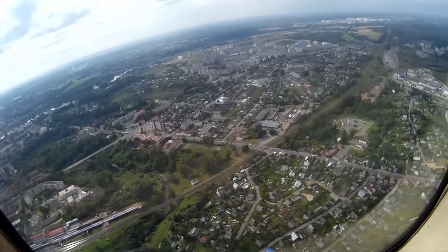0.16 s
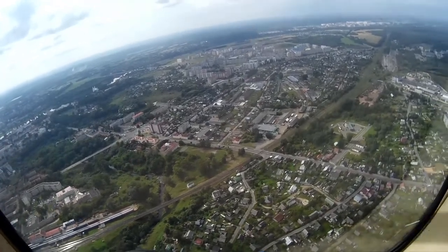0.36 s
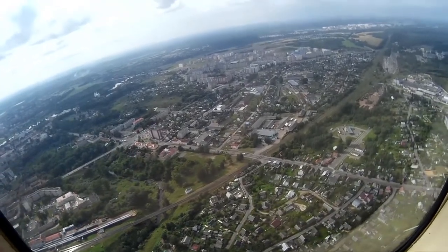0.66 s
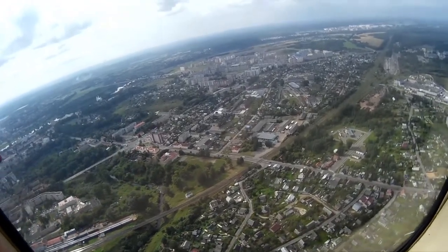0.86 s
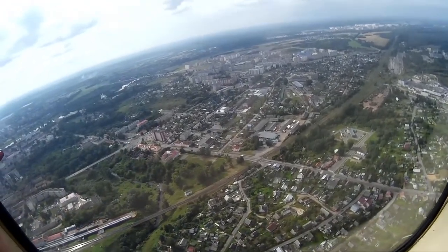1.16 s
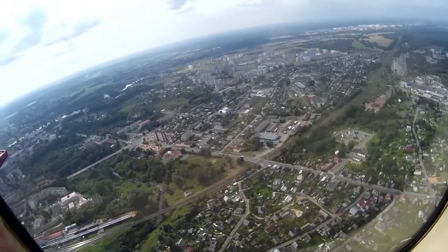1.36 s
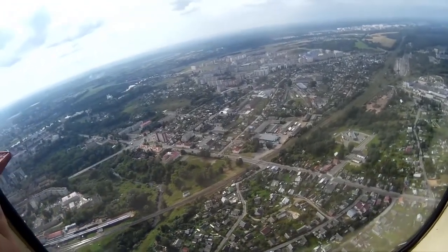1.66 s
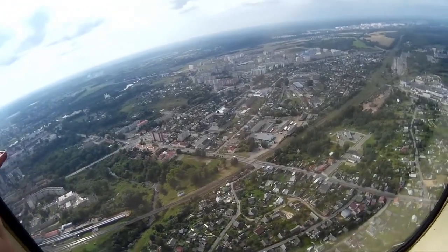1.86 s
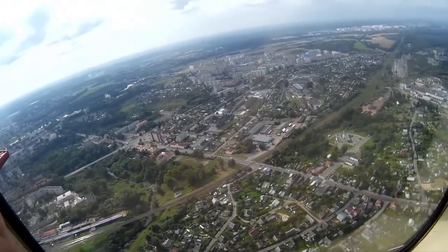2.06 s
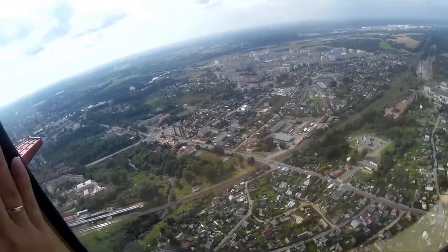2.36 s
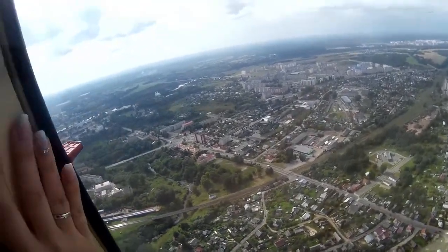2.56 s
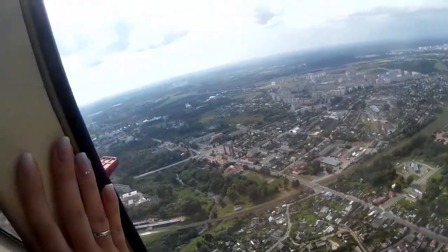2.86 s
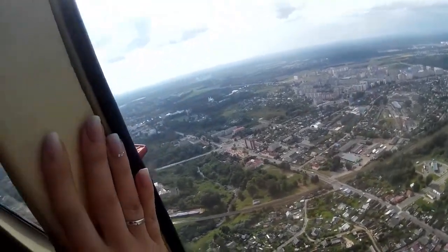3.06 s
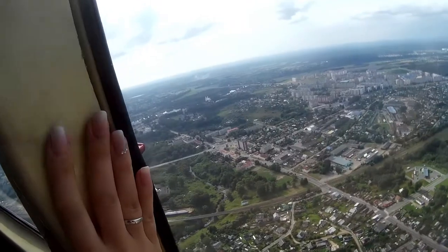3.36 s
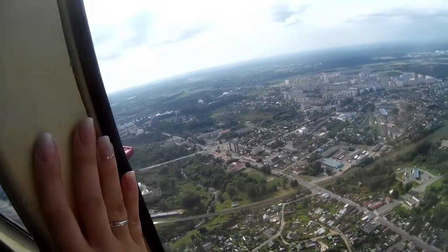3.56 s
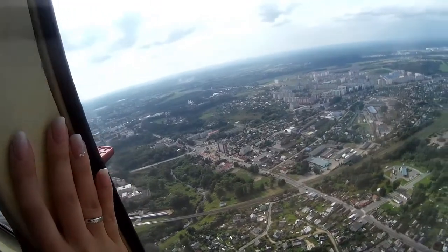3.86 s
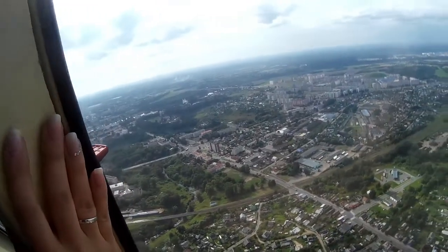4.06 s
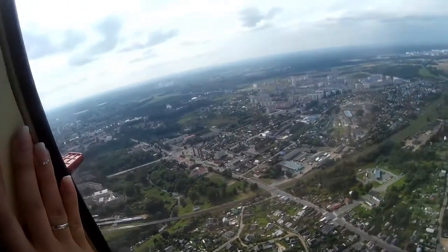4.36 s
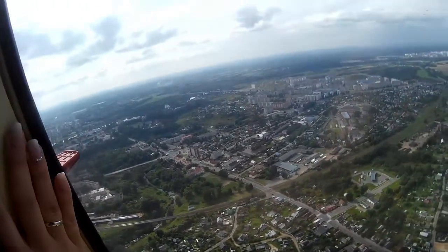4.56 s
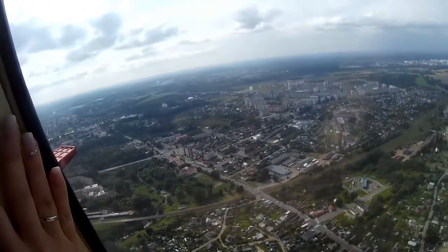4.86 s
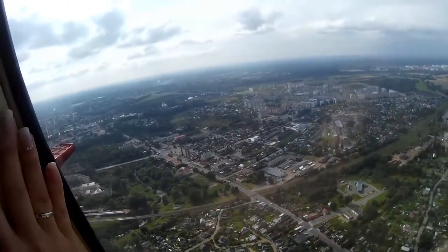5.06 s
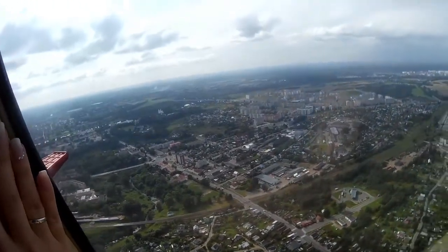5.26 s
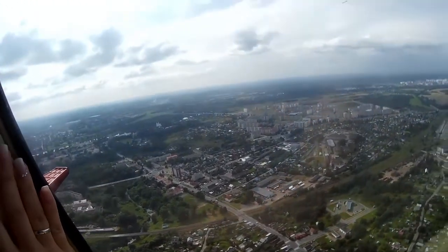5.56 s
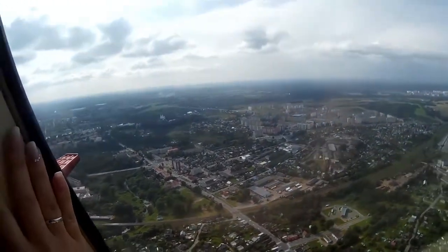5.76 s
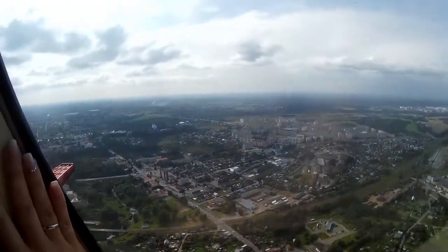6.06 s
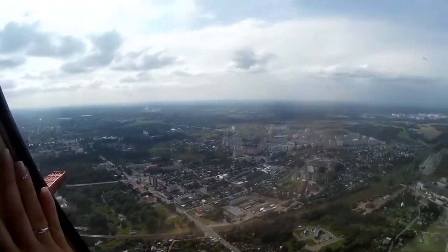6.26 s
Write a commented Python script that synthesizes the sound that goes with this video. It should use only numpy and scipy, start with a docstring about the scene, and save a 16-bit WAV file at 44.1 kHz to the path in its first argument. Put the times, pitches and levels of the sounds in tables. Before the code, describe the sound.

Inside a flying helicopter cabin, a loud steady engine drone and low hum sit under a piercing, fluttering gear whine, with wind roar throughout.

```python
"""Helicopter cabin in level flight

Heard by a small camera held by hand at the window. Gear teeth whine, shafts and a pump hum, and blades
pump the air: sines that follow one slowly wandering rotor speed. One free tone keeps its own speed.
Wind and engine roar and turbine hiss are shaped noise. The overloaded microphone clips the crests."""
import sys
import numpy as np
from scipy import signal
from scipy.fft import rfft, irfft
from scipy.io import wavfile
from scipy.ndimage import uniform_filter1d

SR = 44100
rng = np.random.default_rng(int(sys.argv[2]) if len(sys.argv) > 2 else 0)


def ratio(d):
    """dB to gain"""
    e = np.asarray(d, float) / 20
    return 10 ** e


def materialize(psi):
    """Save the field psi as 16-bit PCM at rate SR to the path in sys.argv[1].

    A 1-D psi becomes a single channel; in a 2-D psi each row is a channel.
    """
    bounded = np.clip(np.atleast_2d(psi).T, -1, 1)
    quanta = np.round(bounded * 32767).astype(np.int16)
    wavfile.write(sys.argv[1], SR, quanta)


N = 282240  # samples, 6.4 s

# Noise colour of wind and engines through the hull. Each row: frequency in Hz, relative density in dB per Hz.
ROAR_COLOUR = [(3, -25), (15, -4), (32, -2.5), (54, -4), (95, -1.5), (120, -4), (165, 4), (215, -3.5),
               (250, -1.5), (350, -7.5), (720, -11), (1500, -20), (2600, -23), (3600, -34.5), (4500, -34),
               (15000, -59.5)]
# Gusts on the hull. Each row: time in seconds, deep buffet gain in dB, boom gain in dB.
GUSTS = [(0, -2, 0.5), (1.2, 0, -0.5), (2.4, -4.5, -4.5), (3.6, -2, -2.5), (4.8, 0, -1.5), (5.6, -2, -2),
         (6.4, 6, 1)]
ROAR_DB = -16  # rms
HISS_HZ, HISS_WIDTH_HZ, HISS_DB = 11560, 850, -55.5  # level in dB rms before its slow waver

# Pitch of a tone that keeps its own speed. Each row: time in seconds, frequency in Hz.
FREE_TONE_PITCH = [(0, 683), (1, 682), (2.5, 679.6), (4, 686), (5.4, 688), (6.4, 682)]
FREE_TONE_DB = -32.5  # rms, before its waver

# Rotor speed, shown by the pitch of the input gear mesh. Each row: time in seconds, tooth rate in Hz.
MESH_PITCH = [(0, 2266.5), (.3, 2271.4), (.91, 2277.6), (1.4, 2278.2), (2, 2275.7), (2.44, 2276),
              (2.85, 2271.7), (3.28, 2277), (3.7, 2267.5), (4.0, 2269.5), (4.57, 2269.2), (5.3, 2286.5),
              (5.92, 2278.8), (6.4, 2288)]
# Every other rate that follows the rotor is the one at this usual tooth rate.
USUAL_MESH_HZ, SHAFT_TEETH = 2275.5, 23
PUMP_HZ, MAIN_GEAR_HZ, BLADE_HZ = 152.83, 644., 12.39
BLADE_DB, BLADE_FIRST_S, BLADE_THROB = -20, 0.039, 0.16  # dB rms, first crest in s, share of gear level

# Tones that swell as the camera moves through the cabin's standing waves. Each row: time in seconds,
# pump third harmonic in dB, then main gear harmonics 1, 2, 3, 6 and 7 in dB.
SWELLING_TONES = [(0, -19.5, -19.5, -25.5, -33, -51, -42), (1.1, -20, -19.5, -33, -33, -47, -47),
                  (2.1, -20.5, -20, -32, -35, -45, -45), (2.3, -21.5, -20.5, -28.5, -29, -56, -46),
                  (3.2, -22, -21.5, -28.5, -37, -52, -53), (3.7, -23, -20, -29.5, -48, -52, -52),
                  (4.4, -21.5, -19.5, -23, -35, -49, -49), (5.3, -19.5, -19, -22, -29, -53, -47),
                  (6.1, -18.5, -18.5, -31, -30, -50, -53), (6.4, -20, -18.5, -26.5, -32, -48, -50)]
GEAR_HARMONICS = 1, 2, 3, 6, 7
# Steadier pump hum. Each row: harmonic number, level in dB rms before its waver.
PUMP_HARMONICS = [(1, -14.8), (2, -27.5), (4, -33), (5, -37), (6, -40), (7, -35), (8, -44), (9, -42),
                  (10, -43), (11, -44)]
# Drive shaft hum. Each row: harmonic number, level in dB rms before its waver.
SHAFT_HARMONICS = [(1, -14.6), (2, -33), (10, -46)]
# Other tones that follow rotor speed: faint hums, and sum and difference tones of whine and main gear.
# Each row: frequency in Hz, level in dB rms before its waver.
FAINT_TONES = [(48.4, -45), (128.9, -39), (243, -36), (402.1, -33), (491.2, -42), (578.7, -37), (827, -35),
               (987.5, -40), (1073.3, -36), (1116.4, -37), (1255.3, -43), (1483.8, -44), (1631.5, -40),
               (1664.1, -46), (1879.8, -44), (1970, -45), (2023.4, -51), (2122.7, -41), (1986, -42),
               (1507, -44), (1545, -44.5), (2675, -48), (2880, -48), (5010, -55), (5593, -60),
               (2919.4, -44.5), (3092.4, -50), (3348.7, -53)]
FAINT_TONE_WAVER_DB = 1.5

# Three shakes of the airframe, the middle one near blade rate. Each row: rate in Hz, first crest in seconds.
AIRFRAME_SHAKES = [(10.918, .0592), (12.433, .0062), (13.223, .03)]
# Throb of the whine by each shake; below 0 crests and dips swap. Each row: time in seconds,
# share of level from the slow, middle and quick shake at the usual whine level.
THROB_DEPTHS = [(0.0, 0.11, 0.26, -0.08), (0.5, 0.06, 0.31, 0.07), (1.0, 0.23, 0.0, -0.01),
                (1.5, 0.23, 0.26, 0.06), (2.1, 0.17, -0.05, 0.03), (2.7, 0.21, -0.09, 0.38),
                (3.2, 0.25, 0.56, 0.06), (3.7, 0.34, -0.01, 0.24), (4.2, 0.09, 0.55, -0.32),
                (4.7, 0.14, -0.41, -0.64), (5.2, 0.3, 0.09, -0.32), (5.8, 0.25, -0.04, -0.51),
                (6.4, 0.18, -0.28, -0.45)]
# Gear whine as the camera moves through the standing waves. Each row: time in seconds,
# level in dB rms before the throb.
WHINE_LEVEL = [(0, -16), (.35, -15.6), (.9, -18.5), (1.3, -13.8), (1.55, -17.5), (2.2, -17), (2.5, -12.5),
               (2.72, -9.5), (3.07, -13), (3.125, -24.5), (3.3, -21.5), (3.75, -15), (4.08, -18),
               (4.8, -16.5), (5.2, -14.7), (5.6, -17), (5.8, -15), (6.4, -19.5)]
QUIET_DEEPENS, USUAL_WHINE_DB = .63, -16  # dB of throb per dB of quiet, level where it adds nothing
# Overtones of the whine. Each row: time in seconds, then second, third, fourth and fifth harmonic
# in dB before flutter and throb.
WHINE_OVERTONES = [(0, -38.5, -50, -59, -57), (1, -39, -54, -60, -57), (1.5, -42, -52, -57, -56),
                   (2.1, -41, -57, -60, -59), (3.05, -39, -50, -60, -58), (3.5, -40, -50, -59, -57),
                   (4.03, -42, -49, -64, -59), (4.5, -36.5, -54, -59, -55), (5.5, -43, -55, -63, -62),
                   (5.8, -37, -52, -60, -59), (6.4, -45, -56, -64, -64)]
OVERTONE_THROB, OVERTONE_FLUTTER_DB = 0.72, 2  # share of the whine's throb, spread in dB
WOBBLE_TURNS, OVERTONE_WOBBLE_TURNS = -0.16, -0.34  # phase swing per unit of shake
# Sidebands and a faint sixth harmonic of the whine. Each row: multiple of the mesh rate,
# shaft rates added, level in dB rms before its waver.
WHINE_SIDEBANDS = [(1, -2, -41), (1, -1, -36), (1, 1, -34), (1, 2, -35), (1, 3, -43), (6, 0, -70),
                   (1, -.435, -44), (1, .435, -44)]

CLIP = .705  # of full scale
TREBLE_HZ, ADDED_TREBLE_DB = 13800, 0.5  # gain of the treble copy added to the signal


def level(x, db):
    """Scale to an rms level."""
    return x * ratio(db) / np.sqrt(np.mean(x ** 2))


def curves(table):
    """Columns of a table, joined by straight lines in time."""
    s, *columns = np.transpose(table)
    return [np.interp(np.arange(N) / SR, s, column) for column in columns]


def walk(rate):
    """Random levels held 1 / rate s and slewed twice; spread near 1."""
    hold = int(SR / rate)
    steps = np.repeat(rng.standard_normal(N // hold + 1), hold)
    return 1.43 * uniform_filter1d(uniform_filter1d(steps, hold), hold)[:N]


def tone(turns, db):
    """Sine that follows a count of turns, at an rms level, from a random phase."""
    return np.sqrt(2) * ratio(db) * np.sin(2 * np.pi * (turns + rng.random()))


def roar():
    """Wind and engine noise in octave bands that swell together and flicker alone; gusts move the bass."""
    hz = np.maximum(np.fft.rfftfreq(N, 1 / SR), 1)
    colour_hz, colour_db = np.transpose(ROAR_COLOUR)
    colour = ratio(np.interp(np.log(hz), np.log(colour_hz), colour_db))
    spectrum = rfft(rng.standard_normal(N)) * colour
    swell_db = 0.51 * walk(0.46)
    buffet_db, boom_db = curves(GUSTS)
    octave = np.log2(np.clip(hz, 16, 16384) / 16)
    out = 0
    for k in range(11):
        # neighbouring bands crossfade, centred on 16 Hz, 32 Hz and so on
        share = np.clip(1 - np.abs(octave - k), 0, 1)
        # buffet in the bands at 16 to 64 Hz, boom in the one at 256 Hz
        gust_db = buffet_db * (k < 3) + boom_db * (k == 4)
        flicker_db = 0.67 * walk(5.5)
        out = out + ratio(gust_db + swell_db + flicker_db) * irfft(spectrum * share, N)
    return level(out, ROAR_DB)


def intake_hiss():
    """Turbine hiss: noise through a broad bell-shaped band high in the treble, wavering in level."""
    hz = np.fft.rfftfreq(N, 1 / SR)
    band = np.exp(-.5 * ((hz - HISS_HZ) / HISS_WIDTH_HZ) ** 2)
    hiss = irfft(rfft(rng.standard_normal(N)) * band, N)
    return level(hiss, HISS_DB) * ratio(1.3 * walk(2.86))


def free_tone():
    """A sine that drifts in pitch apart from the rotor."""
    turns = np.cumsum(curves(FREE_TONE_PITCH)[0]) / SR
    return tone(turns, FREE_TONE_DB + 1.8 * walk(3.25))


def faint_tones(clock):
    """Faint hums, and sum and difference tones of whine and main gear: sines that follow rotor speed."""
    return sum(tone(hz * clock, db + FAINT_TONE_WAVER_DB * walk(2.52)) for hz, db in FAINT_TONES)


def blade_cycle(clock):
    """One cosine cycle for each passing blade."""
    return np.cos(2 * np.pi * BLADE_HZ * (clock - BLADE_FIRST_S))


def blade_pumping(clock):
    """The blades pump the cabin air below the range of hearing."""
    return level(blade_cycle(clock), BLADE_DB)


def gearbox(clock):
    """Drive shaft, pump and main gear: harmonics geared to one rotor."""
    pump_db, *gear_db = curves(SWELLING_TONES)
    shaft_turns = USUAL_MESH_HZ / SHAFT_TEETH * clock
    shaft = sum(tone(k * shaft_turns, db + 0.55 * walk(3.17)) for k, db in SHAFT_HARMONICS)
    pump = tone(3 * PUMP_HZ * clock, pump_db)
    pump = pump + sum(tone(k * PUMP_HZ * clock, db + 1.03 * walk(8)) for k, db in PUMP_HARMONICS)
    gear = sum(tone(k * MAIN_GEAR_HZ * clock, db) for k, db in zip(GEAR_HARMONICS, gear_db))
    # each passing blade loads the main gear teeth
    gear = (1 + BLADE_THROB * blade_cycle(clock)) * gear
    return shaft + pump + gear


def airframe_shake(clock, whine_db):
    """Three shakes as turning complex numbers: the real part is the throb of the whine."""
    shake = 0
    for depth, (hz, first_s) in zip(curves(THROB_DEPTHS), AIRFRAME_SHAKES):
        shake = shake + depth * np.exp(2j * np.pi * hz * (clock - first_s))
    # near a quiet spot of the standing wave the same shake throbs deeper
    return shake * ratio(QUIET_DEEPENS * (USUAL_WHINE_DB - whine_db))


def whine_overtones(mesh, shake):
    """The shaking throbs each overtone too, but its shorter waves crest at other, drifting moments."""
    out = 0
    for harmonic, db in enumerate(curves(WHINE_OVERTONES), 2):
        lag_turns = 0.22 * walk(1.5) + rng.random()
        throb = 1 + OVERTONE_THROB * (shake * np.exp(2j * np.pi * lag_turns)).real
        turns = harmonic * mesh + OVERTONE_WOBBLE_TURNS * shake.real
        out = out + throb * tone(turns, db + OVERTONE_FLUTTER_DB * walk(40))
    return out


def whine(mesh):
    """Input gear mesh; it throbs as three shakes move the camera in the short standing waves."""
    whine_db = curves(WHINE_LEVEL)[0]
    shake = airframe_shake(mesh / USUAL_MESH_HZ, whine_db)
    # the shaking also moves the camera along the wave, so the pitch wobbles with each throb
    main = (1 + shake.real) * tone(mesh + WOBBLE_TURNS * shake.real, whine_db)
    sidebands = sum(tone(mesh * (k + side / SHAFT_TEETH), db + 1.5 * walk(6))
                    for k, side, db in WHINE_SIDEBANDS)
    return main + whine_overtones(mesh, shake) + sidebands


def scene():
    """All that follows the rotor counts time on its clock, which runs fast when the rotor does."""
    mesh = np.cumsum(curves(MESH_PITCH)[0]) / SR  # gear teeth passed so far
    clock = mesh / USUAL_MESH_HZ
    background = roar() + intake_hiss() + free_tone() + faint_tones(clock)
    machinery = blade_pumping(clock) + gearbox(clock) + whine(mesh)
    return (background + machinery)[None]


def top_cut(x):
    """Nothing passes above the cut-off."""
    return signal.sosfilt(signal.butter(12, 15890, fs=SR, output="sos"), x)


def record(dry):
    """The overloaded input clips both crests flat; the stage after it lifts the top of the treble."""
    clipped = np.clip(dry, -CLIP, CLIP)
    high_pass = signal.butter(2, TREBLE_HZ, "high", fs=SR, output="sos")
    treble = signal.sosfiltfilt(high_pass, clipped)
    mix = clipped + ratio(ADDED_TREBLE_DB) * treble
    return top_cut(mix)


dry = scene()
out = record(dry)
materialize(out)
```